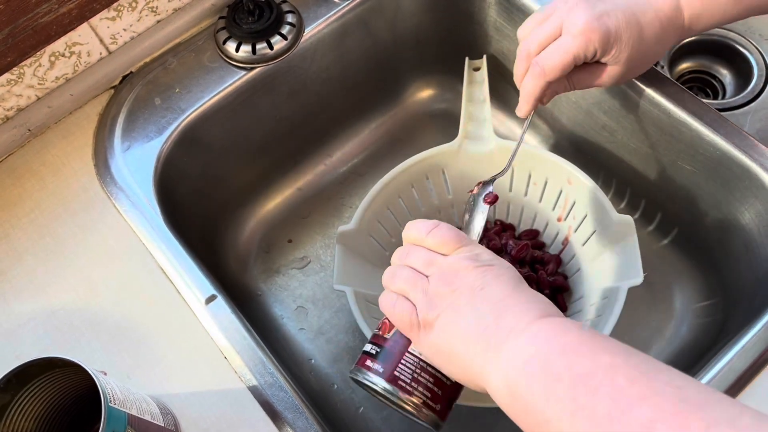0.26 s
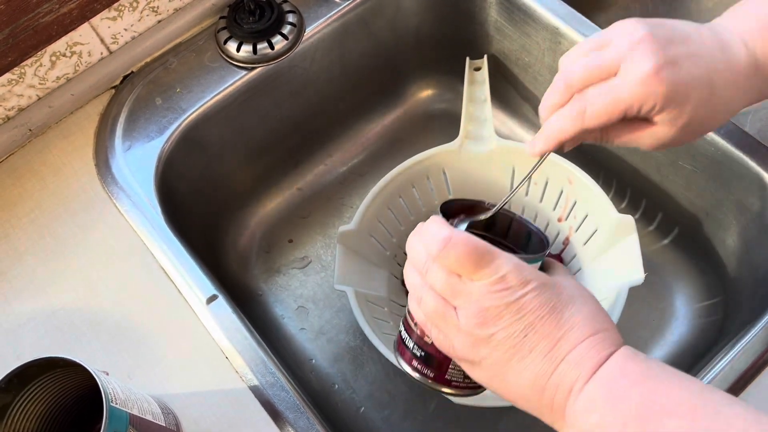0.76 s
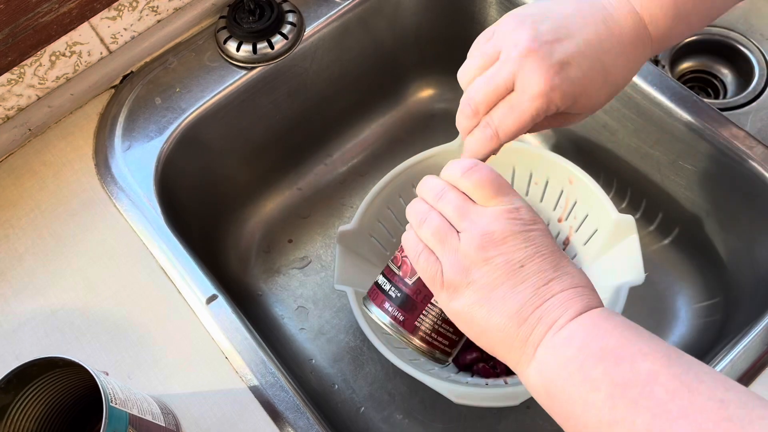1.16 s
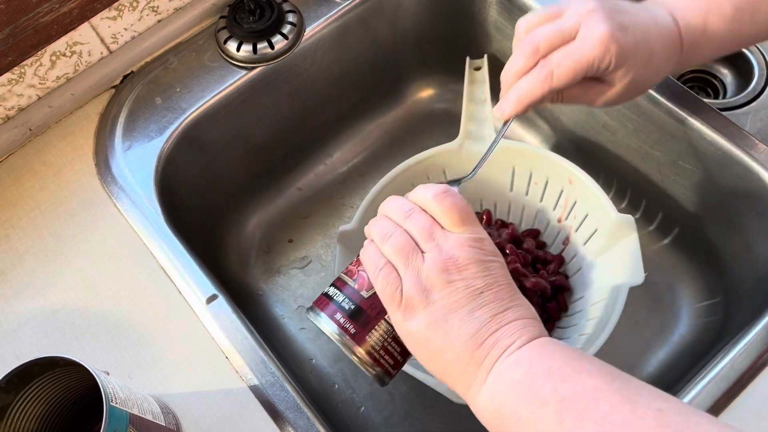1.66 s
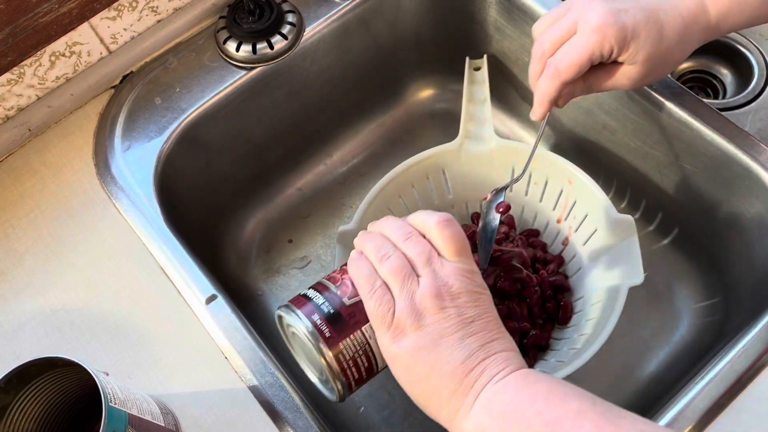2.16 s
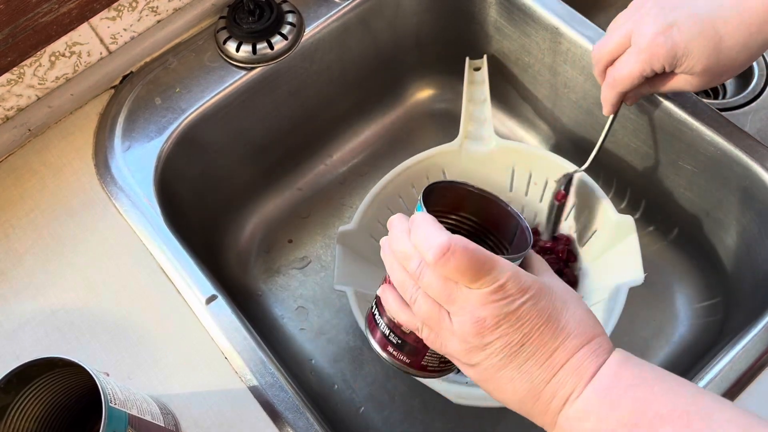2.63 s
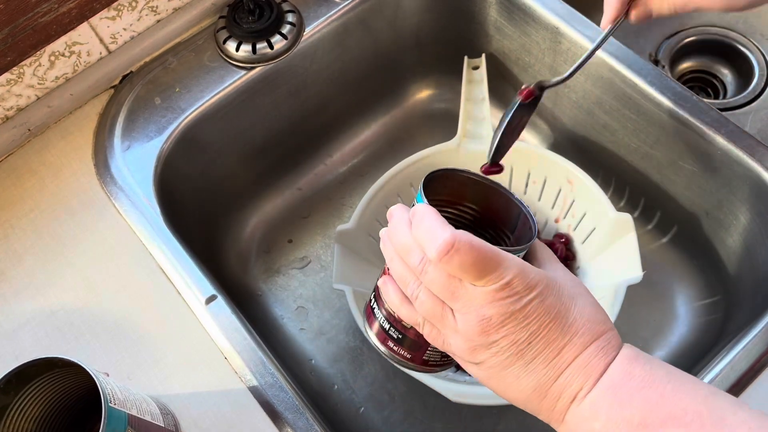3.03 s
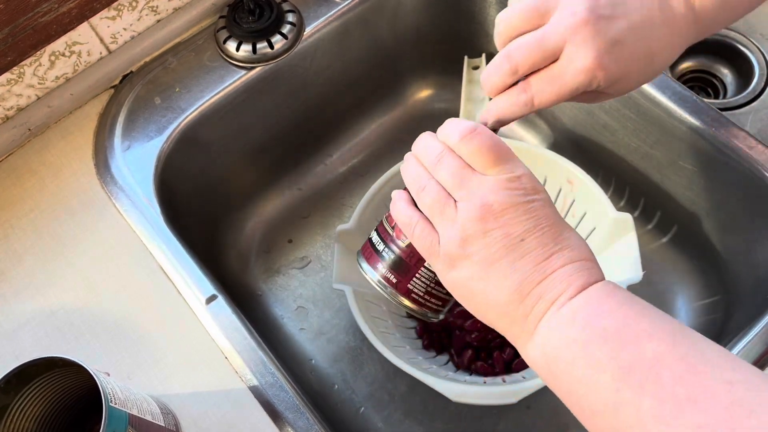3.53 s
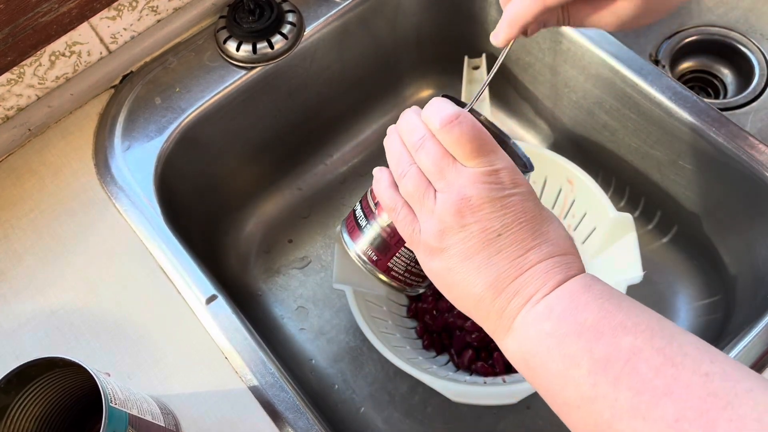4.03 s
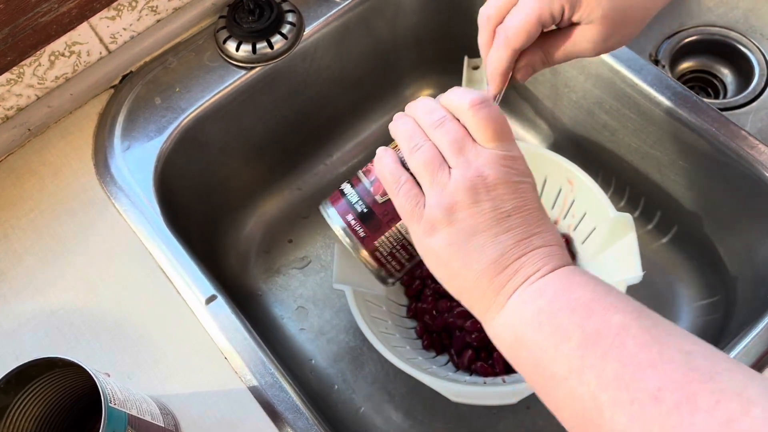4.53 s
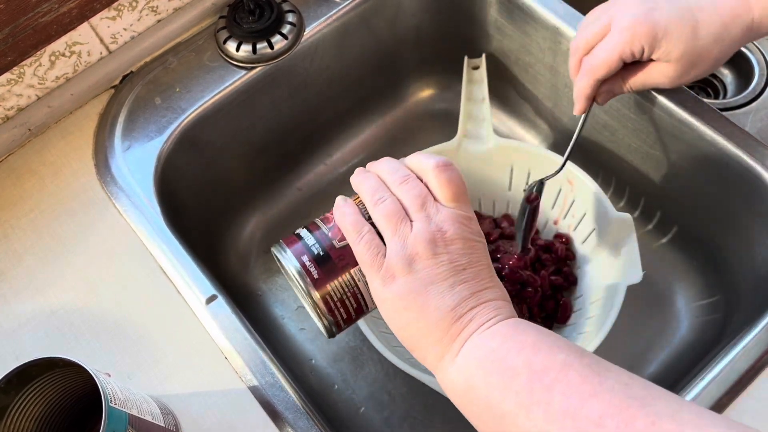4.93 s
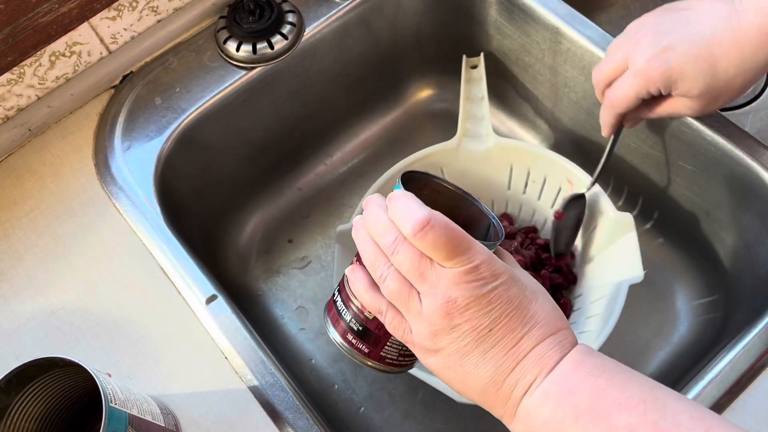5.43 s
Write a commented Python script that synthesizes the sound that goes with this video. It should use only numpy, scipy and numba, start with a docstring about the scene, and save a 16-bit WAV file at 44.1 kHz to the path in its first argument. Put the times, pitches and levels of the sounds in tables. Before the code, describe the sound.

Close stereo microphones in a small kitchen with a low fridge hum. A steel spoon clinks and scrapes inside a damped, hollow-sounding can, then raps a plastic colander three times, with the metal sink booming softly beneath. Quieter scraping and little squeaks in the can follow, before two more loud colander raps near the end.

```python
"""Throughout, a fridge hums in a small kitchen over broadband room noise and a faint high rustle.
Until 1.9 s a steel spoon clinks and scrapes in a hand-held tin can, a bank of damped wall modes with a hollow tone.
From 2.5 to 2.8 s it raps a plastic colander in a steel sink: the bowl cracks and the basin's modes boom under it.
From 3.3 s the can returns, scraped and squeaking, with two faint raps near 4.2 s; raps at 5.2 and 5.4 s end it
but for a last faint clink. Two close microphone ports hear all this with a phase lag that grows in the treble."""
import sys
import numpy as np
from scipy import signal
from scipy.fft import rfft, irfft, next_fast_len
from scipy.io import wavfile
from numba import njit

SR = 44100
rng = np.random.default_rng(int(sys.argv[2]) if len(sys.argv) > 2 else 0)


def volts_from_db(level):
    """Convert decibel levels to linear amplitude ratios."""
    exponent = np.asarray(level, float) / 20
    return 10 ** exponent


def inscribe(sig):
    """Save sig as 16-bit PCM at rate SR to the path in sys.argv[1].

    A 1-D sig is mono; a 2-D sig holds one channel per row.
    Samples are clipped to [-1, 1] before scaling.
    """
    pcm = np.round(np.clip(np.atleast_2d(sig).T, -1, 1) * 32767)
    wavfile.write(sys.argv[1], SR, pcm.astype(np.int16))


N = 250488  # length [samples]

# Fridge hum partials: (frequency [Hz], level [dB])
HUM = [(118.4, -51), (236.9, -59.5), (328.4, -63), (355.3, -57)]
# Spectrum of the steady room noise: (frequency [Hz], relative density [dB])
AIR_SPECTRUM = [(25, -10), (50, -1), (90, -0.5), (200, -7), (340, -6), (550, -11), (1000, -16.5),
                (1700, -25.5), (2300, -22.5), (3000, -30.5), (4600, -27), (5800, -36.5), (8000, -41),
                (16000, -71)]
AIR_DB = -49  # rms level of that noise
# Swells of the high rustle: (time [s], level [dB], half length [s])
RUSTLE = [(0, -78, 0.11), (0.35, -77, 0.019), (1.622, -72, 0.039), (2.235, -64, 0.018),
          (5.098, -73.5, 0.12), (5.68, -81, 0.38)]
RUSTLE_FLOOR_DB = -82.5
# Spectrum of the rustle: (frequency [Hz], relative density [dB])
RUSTLE_SPECTRUM = [(6000, -48.5), (9000, 7.0), (13500, 2.0), (15000, -32.5)]
# Likeness of left and right in diffuse sound: (frequency [Hz], correlation [1])
LIKENESS = [(60, 1), (290, 0.75), (640, 0.033), (1400, 0.12), (3100, 0.32), (6500, .3), (8300, 0.94),
            (10000, 0.63), (12000, 1)]
# Edges of the half-octave bands of diffuse sound: (frequency [Hz])
BAND_EDGES = 28 * 2 ** np.arange(0, 9.3, 1 / 2)
# Decay of the room: (frequency [Hz], t60 [s])
ROOM_T60 = [(100, 0.37), (500, 0.76), (2000, 0.39), (5000, 0.4), (12000, 0.22)]
# Colour of the room: (frequency [Hz], relative level [dB])
ROOM_TONE = [(100, -8), (400, -9), (750, -10), (1100, -4), (2800, -2), (4500, -5), (8000, -8), (14000, -12)]

# Sink basin modes: (frequency [Hz], level after a rap [dB], level after a thud [dB], t60 when undamped [s])
BASIN_MODES = [(56, -11, -13.5, 0.4), (91.1, -14, 0.5, .15), (143, 0, -9.5, 0.27), (167.6, -11, 14, .08),
               (281, -11, -8.5, 0.08), (326, -19, -11, .12), (396.4, -23, -13, 0.18)]
# Colander settling and beans dropping on the basin: (time [s], relative level [dB])
THUDS = [(1.142, -36), (1.181, -35.5), (1.221, -34), (1.296, -43), (2.32, -37.5), (2.605, -41.5),
         (2.91, -27.5), (2.96, -44), (4.24, -44), (5.064, -33), (5.297, -31), (5.54, -32)]
RESEATED_SHARE = 0.23  # share of the floor mode's ring time left once the bowl sits on it again

# Spoon on colander: (time [s], level [dB], push on basin floor re level [dB], push on basin walls re level [dB],
# favoured frequency of the struck spot [Hz], time the bowl is off its feet [s])
RAPS = [(2.524, -12, -39, -41, 3240, 0.035), (2.652, -7.5, -40, -44, 3040, 0.037),
        (2.792, -6.5, -40.5, -37, 2850, 0.044), (4.231, -31.5, -58, -18.5, 1450, 0.059),
        (4.258, -55.5, -44, -17, 570, .05), (5.223, -3, -38.5, -34, 1894, 0.033),
        (5.385, -7, -37, -36, 1510, 0.025)]
# Colander bowl modes: (frequency [Hz], relative level [dB], t60 [s])
COLANDER_MODES = [(345, -11.5, 0.0064), (598, -8, 0.11), (879.7, -10, 0.13), (1070, -2.5, 0.045),
                  (1162, -6.5, 0.04), (1310, -1, 0.04), (1438, -8, 0.064), (2066, 7.5, 0.012),
                  (2110, 0, 0.013), (2760, 2.5, 0.0096), (2915, -1, 0.019), (3223, -5, 0.013),
                  (3607, -7.5, 0.012), (4500, -1.5, 0.0078), (4940, -16, 0.0045)]
# Spectrum of steel on plastic: (frequency [Hz], level [dB])
KNOCK_SPECTRUM = [(150, -11), (500, 1), (1200, 3), (2500, -4.5), (3200, -4.5), (4500, -9), (6500, -8.5),
                  (9000, -10.5), (12000, -12.5), (16000, -19.5)]
RATTLE_DB, RATTLE_S = -22, 0.015  # shaken beans against the bowl: level re rap, time constant
SPOT_LIFT_DB = 6.5  # greatest gain of a bowl mode at the struck spot's favoured frequency

# Spoon on can: (time [s], crack level [dB], hollow tone re crack [dB],
# favoured frequency of the struck spot [Hz], greatest lift of modes there [dB])
CLINKS = [(0.137, -38.5, -14, 2550, -16), (0.6585, -14, -2, 3740, 7), (0.7503, -37, -30, 3230, 8),
          (.857, -6.5, -6, 1895, 14.5), (1.0191, -10.5, -5, 2070, 16), (1.033, -20, -40.5, 3720, 16),
          (1.0479, -22, -4.5, 3290, 21.5), (1.3513, -42, 8, 2760, 39.5), (1.4388, -40.5, -7, 1997, 6),
          (1.7225, -45.5, 8.5, 4070, 24.5), (1.8115, -7.5, -18, 2102, 20), (1.8125, -22, -4.5, 869, 34),
          (1.814, -23.5, -2, 6380, 35.5), (1.8325, -22, -1, 2660, 34.5), (1.8367, -21, -40, 1145, 33.5),
          (1.8401, -29, -38, 2180, 32), (1.835, -27, -18, 4520, 28.5), (3.3044, -29.5, 4, 1740, 25),
          (4.664, -48, 19, 2500, 7), (4.6985, -46, 19, 3330, 14), (3.306, -24.5, -2, 4070, 18.5),
          (3.421, -45.5, -7, 1460, 12), (3.4443, -46, -6.5, 4610, 26), (3.6389, -53, 13, 4500, 20.5),
          (3.6887, -45.5, -9, 2000, 21.5), (3.9666, -40.5, 9, 3700, 6), (4.0317, -44.5, 3.5, 1970, 8),
          (4.1144, -37, -12, 4060, 15), (4.2317, -24.5, -0.5, 2247, 20), (4.2445, -45, 14, 1093, 43),
          (4.2641, -43.5, 12.5, 407, 16.5), (4.4085, -35, -4, 4400, 11), (4.4794, -57, 20, 1940, 11),
          (4.505, -58, -17, 2040, 41), (4.7293, -35, -25, 4490, 23.5), (4.8475, -42, -27, 5240, 38.5),
          (5.6556, -54, -13, 1980, 16)]
# Can wall modes: (frequency [Hz], relative level [dB], t60 [s])
CAN_MODES = [(410, -12, 0.06), (868.3, 3.5, 0.04), (1056, 0, 0.092), (1145, 1, 0.04), (1124, -18, 0.34),
             (1340, 4.5, 0.02), (1743, -15.5, 0.24), (1840, -24, 0.6), (1962, -27, 0.5), (1940, 1.5, 0.027),
             (2040, -4, 0.037), (2110, -19, 0.086), (2347, -6.5, 0.048), (2500, -3.5, 0.019),
             (2660, -11.5, 0.029), (2860, -19, 0.19), (3260, -13.5, 0.14), (3450, -15.5, 0.17),
             (3560, -2.5, 0.066), (3830, 6, 0.008), (3850, -13.5, 0.047), (4070, -4.5, 0.012),
             (4390, -1, 0.025), (4740, -8.5, 0.05), (5096, -10, 0.018), (5690, -5.5, 0.036),
             (6380, -5.5, 0.0057), (7140, -21.5, 0.057), (7890, 7.5, 0.019)]
# Spectrum of steel on tin: (frequency [Hz], level [dB])
CRACK_SPECTRUM = [(150, -40.5), (500, -35), (1200, -0.5), (2500, -3), (4500, -5.5), (6500, -3), (9000, -3),
                  (12000, -8), (16000, -12.5)]
# Hollow tone, broadly sinking as the can empties and damped by the grip:
# (time [s], frequency [Hz], drive of upper partner [dB], share of the full ring time [1])
HOLLOW = [(.6, 702, -3, 1.), (.98, 704, -3, .9), (1.01, 678, -2, .7), (1.12, 695, -2, .7),
          (1.22, 722, -10, .8), (1.298, 707, -10, .8), (1.421, 592, -10, .8), (1.8, 647.5, -10, .8),
          (3.298, 640, -20, .75), (4.3, 635, -20, .8), (4.53, 630, -20, .9), (4.6, 612, -20, .9),
          (4.68, 605, -25, .9), (4.71, 622, -25, 1.2), (4.76, 629, -25, .9)]
# Modes of the hollow tone: (pitch ratio [1], full t60 [s])
HOLLOW_MODES = [(1, 0.11), (1.063, 0.13)]
# The softer the touch, the larger the share of the low wall modes: dB at a crack of 0 dB, dB per dB of softness
LOW_WALL_DB, LOW_PER_SOFT_DB, HIGH_WALL_DB = -36.5, 0.5121, -15.5
# Bursts of rasp: the spoon dragged along the ribbed wall, except the last row, which is no stroke
# but a faint burst of grains heard just before the rap at 5.223 s:
# (start [s], end [s], first rasp level [dB], last rasp level [dB], hollow tone re rasp [dB])
RASPS = [(0.702, 0.746, -57, -54.5, -35), (1.179, 1.292, -55, -57, 15), (1.354, 1.396, -48.5, -45, 2),
         (1.731, 1.814, -42, -37.5, 2), (3.407, 3.457, -60.5, -47.5, 10), (3.631, 3.688, -62.5, -58.5, 5),
         (3.772, 3.796, -47, -40.5, 10.5), (4.12, 4.158, -47.5, -51.5, 13), (4.423, 4.483, -54, -69, -19),
         (4.477, 4.546, -58.5, -40, 8), (4.549, 4.648, -50, -38.5, 2.5), (4.698, 4.728, -44.5, -43, -19),
         (5.205, 5.217, -54.5, -44.5, -5)]
PRESS_DB_PER_S, LIFT_DB_PER_S = 1509.5, 906.5  # slope of the rise before a burst and of the fall after it
# Singing of the edge: (start [s], end [s], first frequency [Hz], last frequency [Hz], level [dB])
SQUEAKS = [(1.19, 1.3, 840, 850, -56), (1.381, 1.399, 4040, 4080, -50.5), (1.735, 1.772, 650, 900, -54),
           (3.412, 3.47, 1450, 1440, -60), (3.77, 3.811, 2600, 2735, -61), (3.785, 3.825, 4470, 4560, -63),
           (4.125, 4.165, 1530, 1500, -56), (4.535, 4.58, 4720, 4560, -54), (4.535, 4.601, 2100, 2250, -58),
           (4.57, 4.605, 3460, 3300, -50), (4.61, 4.668, 3420, 3560, -50), (4.535, 4.575, 5750, 5900, -55),
           (4.56, 4.63, 2450, 2700, -57), (4.598, 4.63, 4085, 4055, -43), (4.63, 4.665, 780, 870, -48),
           (4.63, 4.662, 4300, 4420, -50), (4.72, 4.785, 1770, 1790, -58)]

# Phase by which the left port lags the right: (frequency [Hz], phase [rad])
PORT_LAG = [(300, 0), (700, -1.2), (1350, -1.3), (2000, 0), (3800, -.6), (5200, .3), (6200, .9),
            (7200, 2.1), (8300, 3.14), (9300, 3.9), (10300, 5.1), (11700, 6.2), (13300, 6.3), (14500, 9.3)]
# Left port level over right: (frequency [Hz], level [dB])
PORT_BALANCE = [(700, -0.5), (1500, -1), (3000, 1), (4600, 6), (6500, 1.5), (9000, -3), (12000, 2.5)]


def at_hz(points, hz):
    """Spectral interpolation: reads a table linearly along log frequency."""
    table_hz, values = np.array(points)[:, :2].T
    return np.interp(np.log(hz), np.log(table_hz), values)


def rms_one(x):
    """Normalisation of power: scales to unit rms."""
    return x / np.sqrt(np.mean(x ** 2) + 1e-20)


def clicks(times, levels_db):
    """Impulsive excitation: one-sample impulses at given times."""
    out = np.zeros(N)
    out[(np.asarray(times) * SR).astype(int)] = volts_from_db(levels_db)
    return out


def swell(x, seconds):
    """Cascaded relaxation: two one-pole stages spread a click into a quick rise and fall of the same height."""
    r = np.exp(-1 / (seconds * SR))
    return signal.lfilter([np.e * (1 - r)], [1, -2 * r, r * r], x + 1e-18)


def ring(drive, hz, t60):
    """Damped resonance: a unit click sets a decaying sine of height 1 ringing."""
    r = volts_from_db(-60 / (t60 * SR))
    w = 2 * np.pi * hz / SR
    return signal.lfilter([0, np.sin(w)], [1, -2 * r * np.cos(w), r * r], drive + 1e-18)


@njit
def ring_gliding(drive, w, r):
    """Time-varying resonance: the same resonator with moving pitch and damping."""
    out = np.zeros(len(drive))
    for i in range(2, len(drive)):
        out[i] = np.sin(w[i]) * drive[i - 1] + 2 * r[i] * np.cos(w[i]) * out[i - 1] - r[i] * r[i] * out[i - 2]
    return out


def favour(hz, spot_hz, lift_db, width):
    """Selective excitation: dB gained by a mode near the frequency that the struck spot favours."""
    return lift_db * np.exp(-(np.log(hz / spot_hz) / width) ** 2)


def crack(envelope, colour):
    """Broadband contact noise: enveloped noise through a causal minimum-phase filter."""
    hz = np.maximum(np.fft.rfftfreq(512, 1 / SR), 1)
    # minimum_phase takes the square root of the response, so the dB are doubled first
    linear = signal.firwin2(511, hz - (hz <= 1), volts_from_db(2 * at_hz(colour, hz)), fs=SR)
    taps = signal.minimum_phase(linear)
    return signal.oaconvolve(envelope * rng.standard_normal(N), taps)[:N]


def stereo_pair(mid, side, hz):
    """Partial coherence: mixes two independent noises to the likeness of left and right at hz."""
    alike = np.clip(at_hz(LIKENESS, hz), -1, 1)
    return np.sqrt(1 + alike) * mid + np.sqrt(1 - alike) * side * [[1], [-1]]


def coloured(spectrum):
    """Stationary diffuse noise: shaped random spectrum with partly coherent channels, at unit rms."""
    size = next_fast_len(N)
    hz = np.maximum(np.fft.rfftfreq(size, 1 / SR), 1)
    mid, side = rfft(rng.standard_normal((2, size)))
    both = stereo_pair(mid, side, hz)
    return rms_one(irfft(both * volts_from_db(at_hz(spectrum, hz)), size)[:, :N])


def rustle_level():
    """Superposition of amplitudes: soft Gaussian swells above a steady floor."""
    t = np.arange(N) / SR
    swells = sum(volts_from_db(level_db) * np.exp(-((t - s) / half) ** 2) for s, level_db, half in RUSTLE)
    return volts_from_db(RUSTLE_FLOOR_DB) + swells


def background():
    """Tonal and broadband noise: fridge partials waver slightly over steady room noise and a high rustle."""
    t = np.arange(N) / SR
    wavers = rng.standard_normal((len(HUM), 2, 60))
    out = volts_from_db(AIR_DB) * coloured(AIR_SPECTRUM)
    out += rustle_level() * coloured(RUSTLE_SPECTRUM)
    for (hz, level_db), (sway, surge) in zip(HUM, wavers):
        knots = np.linspace(0, t[-1], len(sway))
        level = volts_from_db(level_db + 0.21 * np.interp(t, knots, surge))
        phase = 2 * np.pi * hz * t + 1.21 * np.interp(t, knots, sway)
        out += np.sqrt(2) * level * np.sin(phase)
    return out


def diffuse(size, shape):
    """Diffuse field: half-octave bands of partly coherent stereo noise, each weighted by shape(hz)."""
    out = 0
    white = rng.standard_normal((2, 2, size))
    for k, (low, high) in enumerate(zip(BAND_EDGES, BAND_EDGES[1:])):
        band = signal.butter(2, [low, high], "band", fs=SR, output="sos")
        mid, side = signal.sosfilt(band, white[k % 2])  # neighbouring bands use different noise
        hz = np.sqrt(low * high)
        out = out + shape(hz) * stereo_pair(mid, side, hz)
    return out


def kitchen(x):
    """Reverberation: quick dense echoes inside the sink, then the room's tail dying band by band."""
    t = np.arange(SR // 2) / SR
    onset = 1 - np.exp(-t / 0.00058)
    sink_echoes = volts_from_db(9.0) * np.exp(-t / 0.0078)

    def shape(hz):
        """Band-wise decay: envelope of the echoes at one frequency."""
        room_tail = volts_from_db(-60 * t / at_hz(ROOM_T60, hz))
        return volts_from_db(at_hz(ROOM_TONE, hz)) * onset * (room_tail + sink_echoes)

    response = volts_from_db(-36.5) * diffuse(len(t), shape)
    return signal.fftconvolve(x[None], response, axes=1)[:, :N]


def basin():
    """Vibration transmission: springy feet pass each blow late and soft to floor and walls, then damp the floor."""
    s, level_db, floor_db, wall_db, _, free_s = np.transpose(RAPS)
    floor = ring(clicks(s + 0.0078, level_db + floor_db), 152.0, 0.02)
    walls = ring(clicks(s + 0.00595, level_db + wall_db), 369.6, 0.03)
    thuds = volts_from_db(-47.0) * ring(clicks(*np.transpose(THUDS)), 90., 0.058)
    t = np.arange(N) / SR
    landing_s = np.append(-1, s + free_s)  # seated from the outset
    seated = t > landing_s[np.searchsorted(s, t)]
    out = 0
    for hz, rap_db, thud_db, t60 in BASIN_MODES:
        share = np.where(seated & (120 < hz < 160), RESEATED_SHARE, 1.)
        push = floor if hz < 220 else walls
        drive = volts_from_db(rap_db) * push + volts_from_db(thud_db) * thuds
        w = np.full(N, 2 * np.pi * hz / SR)
        out = out + ring_gliding(drive + 1e-18, w, volts_from_db(-60 / (t60 * share * SR)))
    return out


def colander():
    """Modal impact: a rap cracks and briefly rings the plastic bowl; slow low bending waves speak later."""
    s, level_db, _, _, spot_hz, _ = np.transpose(RAPS)
    chance = rng.normal(0, 1, (len(s), len(COLANDER_MODES)))
    jitter_s = 0.001473 * rng.random(chance.shape)
    knock = volts_from_db(5.0) * swell(clicks(s, level_db), 0.00077)
    rattle = swell(clicks(s, level_db + RATTLE_DB), RATTLE_S)
    out = crack(knock + rattle, KNOCK_SPECTRUM)
    for k, (hz, mode_db, t60) in enumerate(COLANDER_MODES):
        lift_db = favour(hz, spot_hz, SPOT_LIFT_DB, 0.13)
        strength_db = level_db + mode_db - 10.0 + lift_db + 1.97 * chance[:, k]
        out += ring(clicks(s + 3.74 / hz + jitter_s[:, k], strength_db), hz, t60)
    return out


def squeaks():
    """Stick-slip oscillation: the edge sings in gliding tones of drifting pitch and level, swelling and fading."""
    out = np.zeros(N)
    drift = rng.standard_normal((len(SQUEAKS), 2, 16))
    for (start, end, first_hz, last_hz, level_db), (sway, surge) in zip(SQUEAKS, drift):
        u = np.linspace(0, 1, round((end - start) * SR))
        # random drift with knots 4.2 ms apart, steady after the last
        knots = np.arange(len(sway)) * 0.0042 / (end - start)
        glide_hz = first_hz + (last_hz - first_hz) * u
        phase = 2 * np.pi * np.cumsum(glide_hz) / SR + 0.45 * np.interp(u, knots, sway)
        level = 2 * volts_from_db(level_db + 1.8 * np.interp(u, knots, surge)) * np.sin(np.pi * u)
        i = round(start * SR)
        out[i:i + len(u)] += level * np.sin(phase)
    return out


def rasp():
    """Stick-slip friction: uneven clicks within each burst, as drives for the wall and the hollow tone."""
    t = np.arange(N) / SR
    wall, hollow = np.zeros(N), np.zeros(N)
    for start, end, first_db, last_db, hollow_db in RASPS:
        off_db = PRESS_DB_PER_S * np.maximum(start - t, 0) + LIFT_DB_PER_S * np.maximum(t - end, 0)
        burst_db = np.interp(t, [start, end], [first_db, last_db])
        press = volts_from_db(np.maximum(burst_db - off_db, -200))
        wall += press
        hollow += volts_from_db(hollow_db) * press
    # the edge catches and lets go, so the clicks crowd and thin out
    clumps = volts_from_db(2.3 * np.interp(t, np.linspace(0, t[-1], 500), rng.standard_normal(500)))
    sizes = volts_from_db(3.45 * np.minimum(rng.exponential(1, N), 4.)) * rng.choice([-1, 1], N)
    grains = rms_one(sizes * (rng.random(N) < 2500. * clumps / SR))
    return grains * wall, grains * hollow


def hollow_tone(drive):
    """Damped resonance: two gliding modes whose pitch and ring time follow the can's emptying and the grip."""
    at, *columns = np.transpose(HOLLOW)
    pitch_hz, partner_db, share = (np.interp(np.arange(N) / SR, at, c) for c in columns)
    out = 0
    for (ratio, t60), level_db in zip(HOLLOW_MODES, (np.zeros(N), partner_db)):
        w = 2 * np.pi * pitch_hz * ratio / SR
        out = out + ring_gliding(volts_from_db(level_db) * drive, w, volts_from_db(-60 / (t60 * share * SR)))
    return out


def can():
    """Modal superposition: clinks and rasp drive one set of modes; the struck spot favours those near one pitch."""
    s, crack_db, hollow_db, spot_hz, lift_db = np.transpose(CLINKS)
    low_db = LOW_WALL_DB - LOW_PER_SOFT_DB * crack_db
    wall, hollow = rasp()
    chance = rng.normal(0, 1, (len(s), len(CAN_MODES)))
    # small random delays of up to 2.2 ms per mode soften the attack of each clink
    late_s = s[:, None] + 0.0022 * rng.random(chance.shape)
    rings = 0
    for k, (hz, level_db, t60) in enumerate(CAN_MODES):
        zone_db = hollow_db if hz < 800 else low_db if hz < 1500 else HIGH_WALL_DB
        strength_db = crack_db + zone_db + favour(hz, spot_hz, lift_db, .06) + 0.5 * chance[:, k]
        drive = clicks(late_s[:, k], strength_db) + volts_from_db(-31.5) * wall
        rings += volts_from_db(level_db) * ring(drive, hz, t60)
    # the hollow tone speaks a little late
    rings += hollow_tone(clicks(s + 0.00263, crack_db + hollow_db - 2.5) + volts_from_db(-29.0) * hollow)
    contact = swell(clicks(s, crack_db), 0.0019) + volts_from_db(-11.5) * swell(np.abs(wall), .0001)
    return rings + squeaks() + crack(contact, CRACK_SPECTRUM)


def scene():
    """Linear superposition: direct sound, its echoes and the background add."""
    no_bass = signal.butter(2, 220., "high", fs=SR, output="sos")  # can and colander are heard without their lowest frequencies
    no_rumble = signal.butter(2, 45., "high", fs=SR, output="sos")
    near = signal.sosfilt(no_bass, can() + colander())
    boom = signal.sosfilt(no_rumble, basin())
    return near + boom + kitchen(near + boom) + background()


def band_limit(x):
    """A steep low-pass at the top of the band."""
    return signal.sosfilt(signal.butter(12, 16510, fs=SR, output="sos"), x)


def record(dry):
    """Two-port reception: ports differ in phase and balance by frequency, cut deep bass and round off peaks."""
    size = next_fast_len(N + 1024)
    hz = np.maximum(np.fft.rfftfreq(size, 1 / SR), 1)
    lag = np.interp(hz, *np.transpose(PORT_LAG))
    half = volts_from_db(at_hz(PORT_BALANCE, hz) / 2) * np.exp(-.5j * lag)  # each port takes half the difference
    ports = irfft(rfft(dry, size) * [half, 1 / half], size)[:, :N]
    ports = signal.sosfilt(signal.butter(2, 32., "high", fs=SR, output="sos"), ports)
    mix = 0.89 * np.tanh(ports / 1.024)
    return band_limit(mix)


dry = scene()
out = record(dry)
inscribe(out)
```